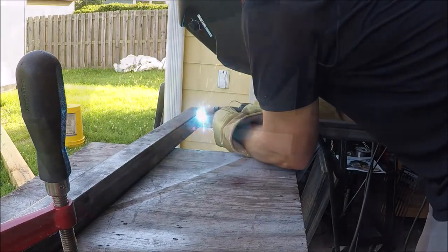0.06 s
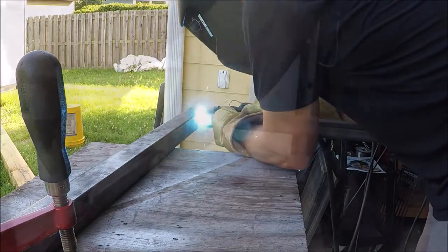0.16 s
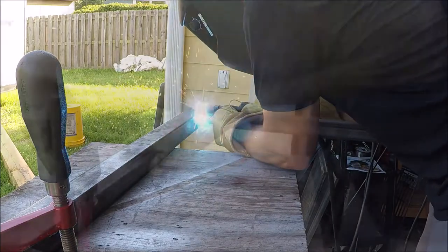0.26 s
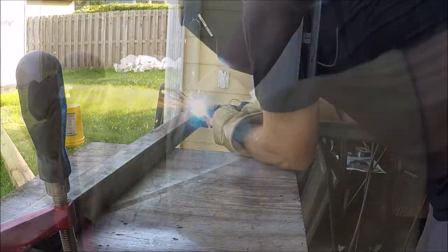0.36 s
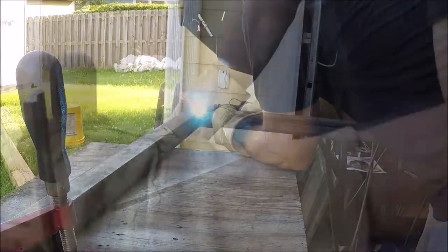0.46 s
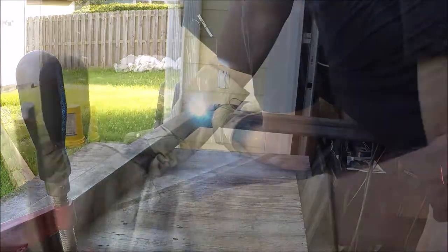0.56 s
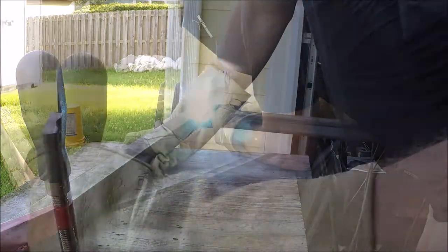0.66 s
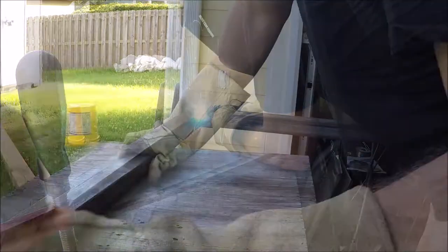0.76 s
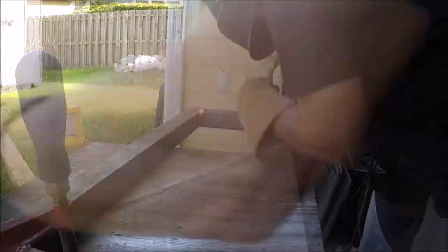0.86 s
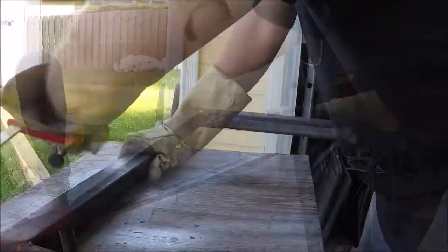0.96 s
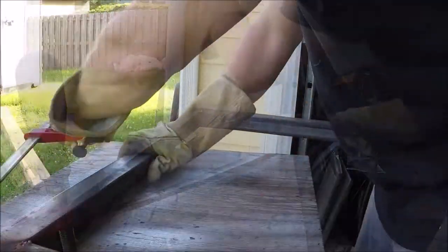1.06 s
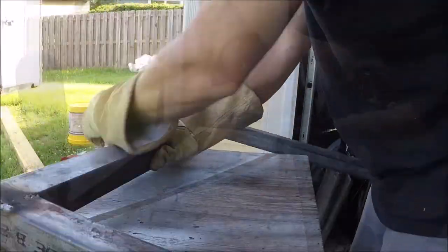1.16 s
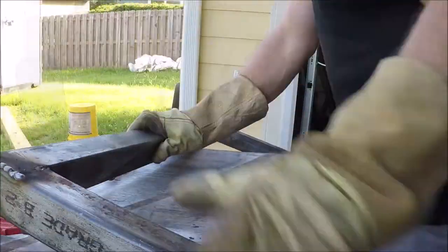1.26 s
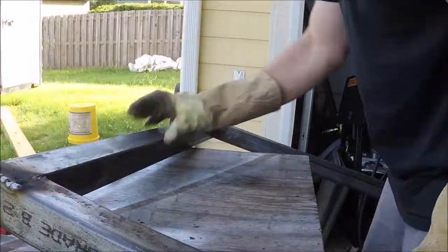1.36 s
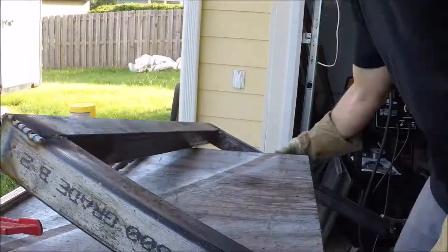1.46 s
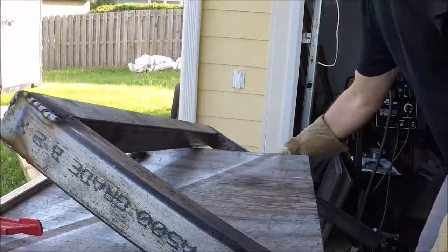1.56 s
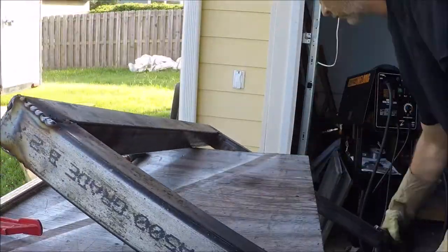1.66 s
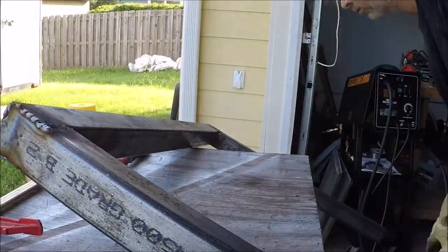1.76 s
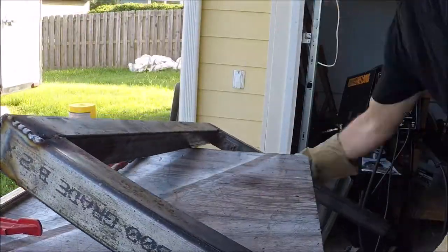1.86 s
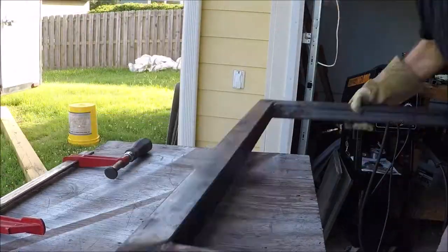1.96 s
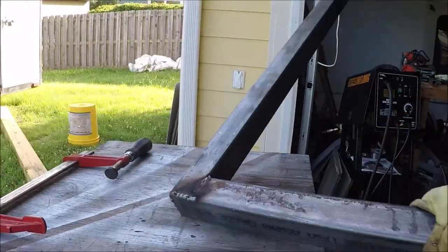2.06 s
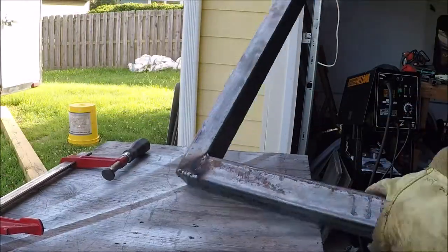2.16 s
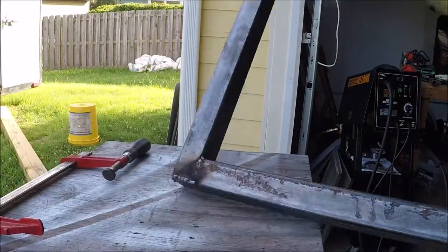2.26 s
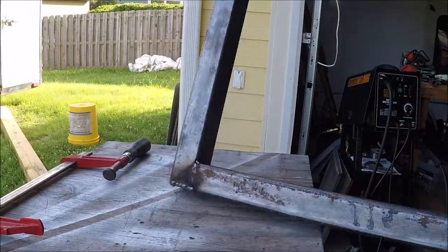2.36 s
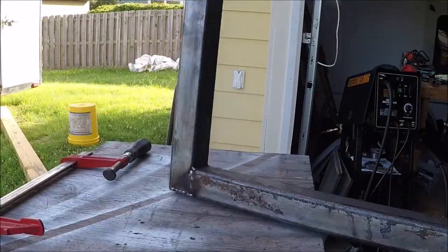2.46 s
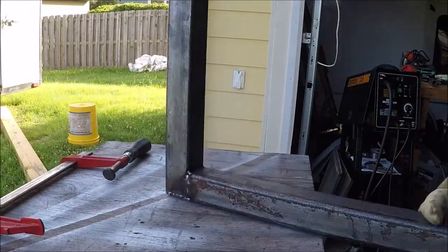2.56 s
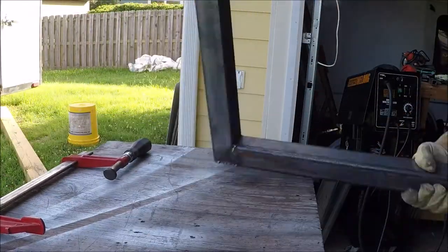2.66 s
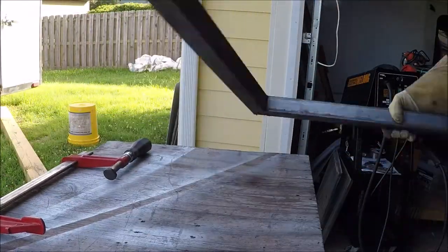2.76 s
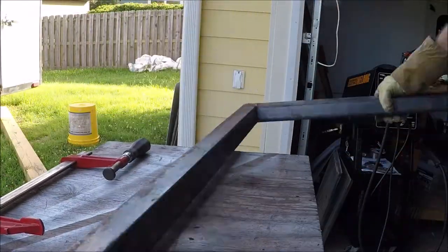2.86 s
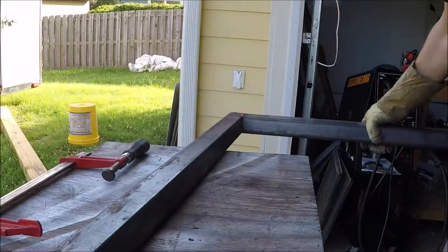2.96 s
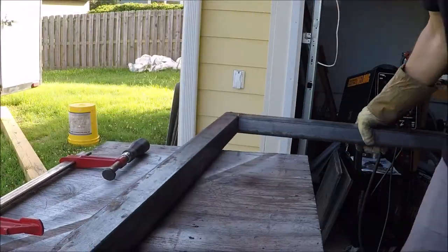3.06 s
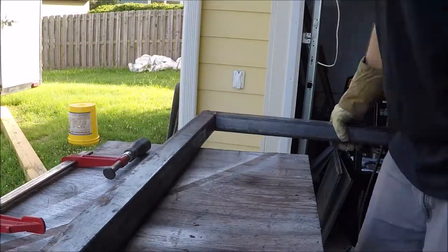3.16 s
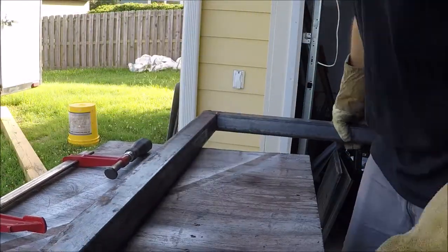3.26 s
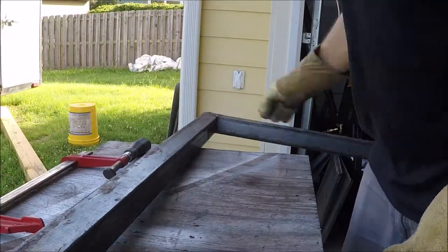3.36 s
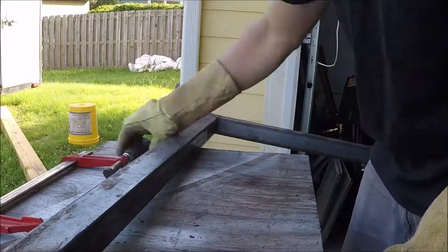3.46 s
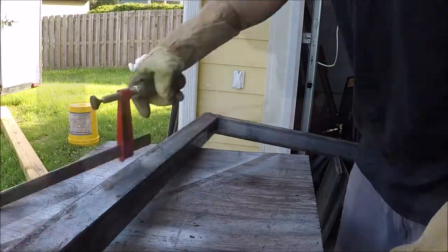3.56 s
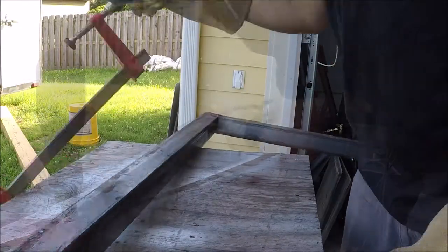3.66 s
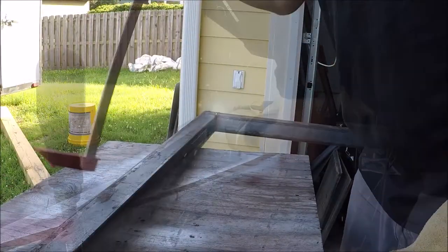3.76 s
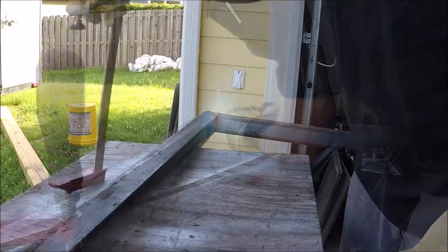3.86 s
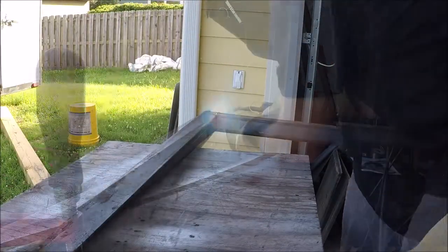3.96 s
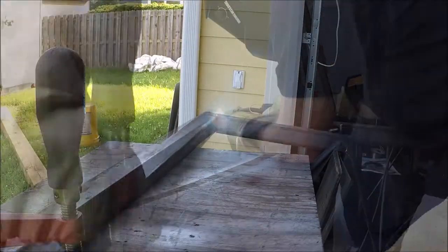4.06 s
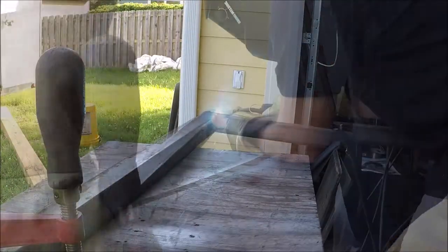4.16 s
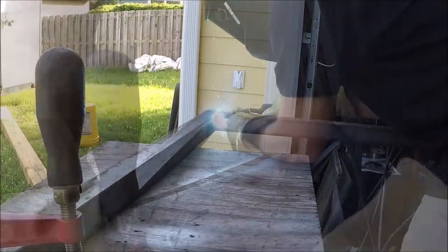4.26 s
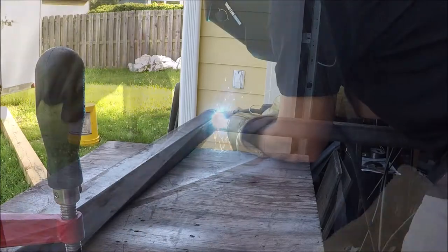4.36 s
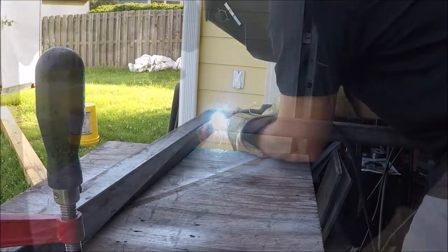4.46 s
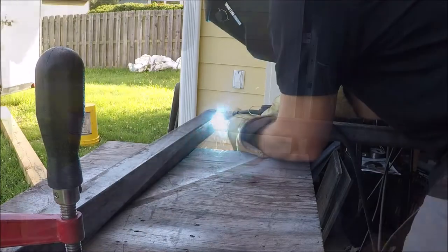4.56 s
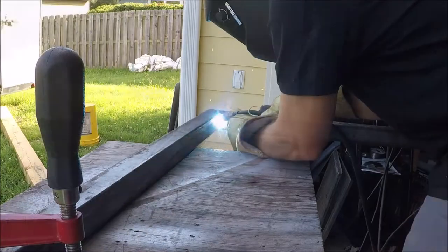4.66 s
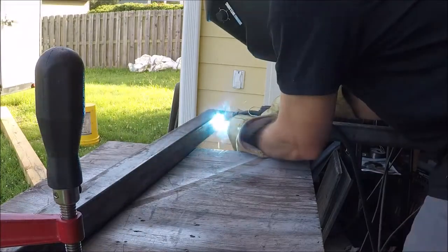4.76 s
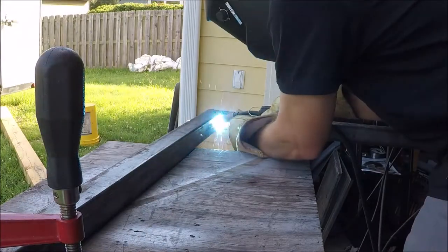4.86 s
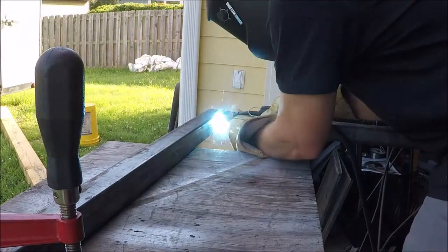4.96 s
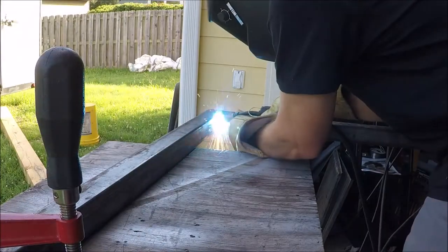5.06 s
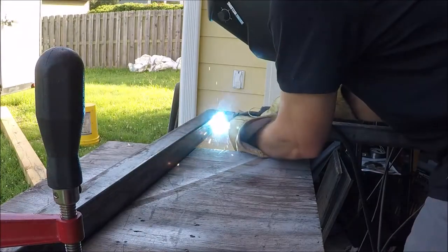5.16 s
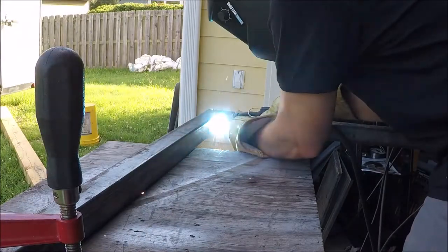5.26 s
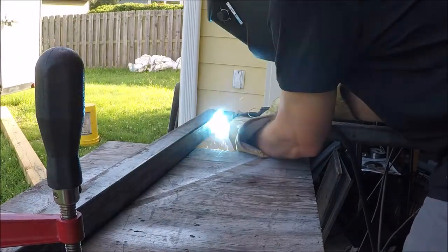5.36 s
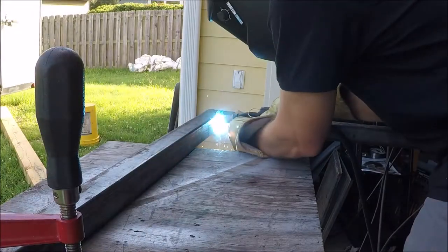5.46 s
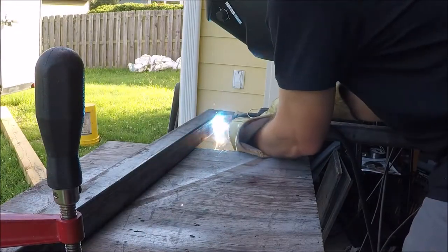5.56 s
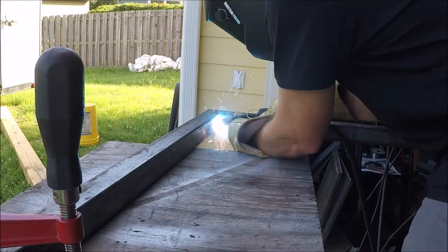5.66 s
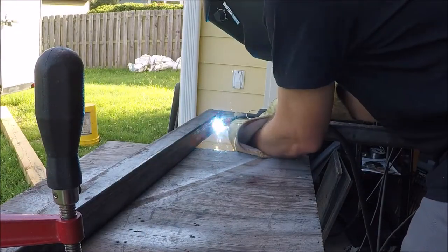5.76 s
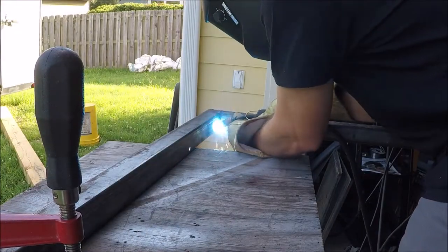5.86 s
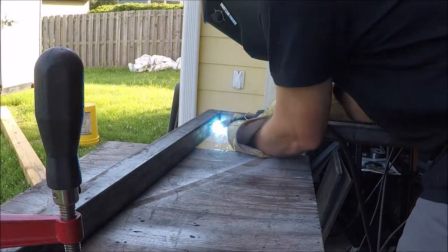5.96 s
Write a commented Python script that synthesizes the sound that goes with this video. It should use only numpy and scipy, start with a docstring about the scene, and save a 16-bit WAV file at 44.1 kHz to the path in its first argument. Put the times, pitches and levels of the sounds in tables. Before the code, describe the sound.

Sharp electric welding sputter gives way to a clamp clink and dull metallic knocks of a turned frame, then sputtering resumes over faint fan noise.

```python
"""At an open workshop door, a frame of square steel tubing is wire-welded on a wooden bench.
The arc, a train of short-circuit snaps, crackles and stops; a clamp clinks off, the frame is turned over
and clatters down (damped modes struck by blows), the clamp is dragged back and the arc starts again.
Gloves and sliding steel are shaped noise; a fan of noise and whines runs throughout, and a puff of wind
buffets the one close microphone near the start."""
import sys
import numpy as np
from scipy import signal
from scipy.fft import rfft, irfft
from scipy.io import wavfile
from scipy.ndimage import uniform_filter1d

SR = 44100
rng = np.random.default_rng(int(sys.argv[2]) if len(sys.argv) > 2 else 0)


def store_wav(level_fs):
    """Save 16-bit WAV to argv[1]."""
    pcm = np.round(np.clip(np.atleast_2d(level_fs), -1, 1) * 32767)
    wavfile.write(sys.argv[1], SR, pcm.T.astype(np.int16))


N = 264860
TIME = np.arange(N) / SR


def undb(db):
    """Logarithmic level: decibels to amplitude gain."""
    return 10 ** (np.asarray(db) / 20)


def unit(x):
    """Power normalisation: scale to rms 1."""
    return x / np.sqrt(np.mean(x ** 2) + 1e-20)


def unit_attack(x, size=900):
    """Onset normalisation: scale so that the first 20 ms have rms 1."""
    return x / np.sqrt(np.mean(x[:size] ** 2) + 1e-20)


def curve(rows, axis=1):
    """Linear interpolation: one column of a table, joined by straight lines in time."""
    rows = np.array(rows)
    return np.interp(TIME, rows[:, 0], rows[:, axis])


def fade(t60, size):
    """Exponential decay by 60 dB in t60 seconds."""
    return np.exp(-np.log(1000) * TIME[:size] / max(t60, 1e-3))


def add(track, s, sound):
    """Superposition: mix a sound in at time s."""
    i = max(int(s * SR), 0)
    track[i:i + len(sound)] += sound[:max(N - i, 0)]


def colour(x, points, size=4096):
    """Minimum-phase filtering: a causal response through (Hz, dB) points."""
    hz, db = np.transpose(points)
    bins = np.fft.rfftfreq(size, 1 / SR)
    response_db = np.interp(np.log(bins + 1), np.log(hz), db)
    cepstrum = irfft(np.log(undb(response_db)))
    # folding the cepstrum onto positive times makes the filter causal
    fold = 1 + np.sign(size // 2 - np.arange(size))
    fold[0] = 1
    impulse = irfft(np.exp(rfft(cepstrum * fold)))
    return signal.fftconvolve(x, impulse)[:len(x)]


def high_pass(x, hz, order=6):
    """Butterworth high-pass filtering."""
    return signal.sosfilt(signal.butter(order, hz, "highpass", fs=SR, output="sos"), x)


def noise(points, size=N):
    """Spectral shaping: coloured noise of rms 1."""
    return unit(colour(rng.standard_normal(size), points))


def walk(count):
    """Low-passed chance: a smooth wander with spread near 1, turning count times a second."""
    k = SR // count
    steps = np.repeat(rng.standard_normal(N // k + 1), k)
    return 1.3 * uniform_filter1d(steps, k)[:N]


def scatter(x, t60, size=22050):
    """Diffuse reflection: a decaying noise tail with the energy of the direct sound."""
    tail = rng.standard_normal(size) * fade(t60, size) * (1 - fade(0.0031, size))
    return signal.fftconvolve(x, tail / np.linalg.norm(tail))[:N]


def burns(bead):
    """Gating: true while this bead is being laid."""
    return (TIME >= bead[0][0]) & (TIME <= bead[-1][0])


# The two beads. Each row: time in seconds, crackle level in dB.
BEADS = [
    [(0, -34), (0.25, -34), (0.32, -30.5), (0.45, -34), (0.78, -30), (0.858, -26)],
    [(3.69, -45), (3.78, -35.5), (4.0, -30), (4.4, -33.5), (4.7, -31), (4.86, -35), (5.1, -33),
     (5.7, -34.5), (5.87, -36), (6.01, -34)],
]
# Wire feed. Each row: time in seconds, nominal short circuits per second,
# unevenness of the snaps in dB before the supply limits them.
WIRE_FEED = [(0, 384, 4), (0.3, 238, 0.5), (0.5, 323, 6.5), (0.62, 205, 0), (0.85, 335, 2), (3.7, 288, 18),
             (4.0, 453, 6.5), (4.6, 400, 5), (4.95, 272, 3.5), (6, 339, 2)]
# Faltering of the arc. Each row: middle in seconds, depth in dB.
STALLS = [(0.214, -23), (0.278, -11), (0.396, -8), (3.834, -28), (4.827, -50), (5.021, -6), (5.037, -15),
          (5.078, -24), (5.267, -20)]
# Spectrum of one snap. Each row: frequency in Hz, relative level in dB.
SNAP_COLOUR = [(450, -35), (700, -31), (1700, -8), (2700, -5.5), (3400, -9), (4600, -1.5), (6400, 4.5),
               (8400, -2), (9800, 1), (11000, 2.5), (13000, 0), (14200, -1), (15500, 1)]
# Echoes off tube, glove and bench. Each row: delay in ms, amplitude share (negative is inverted).
ECHOES = [(0.268, 0.014), (0.766, 0.12), (1.2, -0.13), (2.352, 0.36), (4.1, 0.16), (6.4, 0.093)]
STALL_S = 0.014  # length of a stall
SNAP_SHARPNESS = 0.15  # 0-1


def arc(count=4000, scatter_db=-9, spatter_db=-10, hiss_db=-20.0, heave_db=1.88):
    """Relaxation process: the wire shorts into the pool and the arc snaps back, harder after a long wait."""
    rate = curve(WIRE_FEED)
    gaps = np.exp(.5 * rng.standard_normal(count))
    gaps /= gaps.mean()
    # the pool heaves, so the shorts come in runs
    expected_shorts = np.cumsum(rate * undb(heave_db * walk(count=70))) / SR
    at = np.searchsorted(expected_shorts, np.cumsum(gaps))
    at = np.minimum(at, N - 1)
    # the supply limits the current of the biggest snaps
    uneven_db = curve(WIRE_FEED, axis=2)[at] * rng.standard_normal(count)
    sizes = np.tanh(.35 * gaps ** .7 * undb(uneven_db))
    snaps = np.zeros(N)
    snaps[at] = unit(sizes) * np.sqrt(SR / rate[at]) * (at < N - 1)
    # a second pulse of random size, two samples later, gives each snap its own colour
    snaps += .3 * np.roll(snaps * rng.standard_normal(N), 2)
    spatter = unit((rng.random(N) < 2 * rate / SR) * rng.standard_normal(N))
    hiss = undb(hiss_db + 2 * walk(count=150)) * rng.standard_normal(N)
    source = snaps + undb(spatter_db) * spatter + hiss
    source = source - SNAP_SHARPNESS * np.roll(source, 1)  # a faster collapse is brighter
    direct = unit(high_pass(colour(source, SNAP_COLOUR), 450, order=2))
    burning = sum(undb(curve(bead)) * burns(bead) for bead in BEADS)
    stall_db = sum(db * np.exp(-(2 * (TIME - s) / STALL_S) ** 4) for s, db in STALLS)
    direct = direct * burning * undb(stall_db)
    echoes = sum(share * np.interp(TIME - ms / 1000, TIME, direct, left=0) for ms, share in ECHOES)
    return direct + echoes + undb(scatter_db) * scatter(direct, t60=0.0082)


# Blows of frame and clamp on the bench. Each row: start in seconds, relative level in dB,
# brightness in dB, favoured pitch in Hz.
KNOCKS = [(0.284, -24, 2, 970), (0.553, -31.5, 4.5, 1040), (0.572, -25, 1.5, 815), (0.758, -28.5, 1.5, 704),
          (0.831, -28, 5.5, 910), (0.849, -31, 6, 1007), (0.882, -27.5, -6, 700), (1.023, -24, -5, 790),
          (1.052, -26, 10, 1160), (1.114, -24, -5, 690), (1.146, -30.5, 8, 2720), (1.16, -19.5, -2.5, 730),
          (1.201, -12.5, -0.5, 630), (1.212, -20, 10, 950), (1.24, -16.5, -4, 675), (1.869, -34.5, -5, 715),
          (2.009, -17, -8, 800), (2.04, -13.5, 5, 1250), (2.086, -7.5, -2, 604), (2.105, -11.5, 1, 577),
          (2.119, -14.5, 1.5, 694), (2.139, -16, -8, 810), (2.187, -9.5, -2, 620), (2.229, -10, -0.5, 597),
          (2.291, -18, -4.5, 710), (2.341, -30, -2.5, 680), (2.516, -27.5, 2, 1100), (2.59, -27, -8.5, 710),
          (2.619, -27.5, 5, 1060), (2.682, -27.5, -4.5, 670), (2.718, -17, -0.5, 1120),
          (2.727, -26, -10, 740), (2.895, -12, 5.5, 1080), (2.903, -14.5, 6.5, 660), (2.908, -16, 1.5, 613),
          (2.942, -12.5, 3.5, 1120), (2.968, -11.5, 2, 664), (2.993, -17.5, -4, 694),
          (3.059, -21.5, 1, 393), (3.077, -21, -7.5, 770), (3.233, -28, -6, 640), (3.312, -40, 4.5, 1000),
          (3.597, -24.5, -9, 610), (3.627, -12, -7, 720), (3.676, -27.5, 4, 990), (3.719, -30, 3, 971),
          (3.744, -17, -8, 638), (3.79, -29, 4, 1080), (3.858, -6.5, -2, 674), (3.955, -32, -4, 657),
          (4.198, -22, -7.5, 760), (4.226, -32, 10, 1010), (4.523, -24, 6.5, 1089), (4.553, -23.5, -8, 760),
          (4.712, -18.5, -1.5, 800)]
# Light taps while clamp and torch are handled. Each row: start in seconds, end in seconds,
# middle relative level in dB.
HANDLING = [(0.314, 0.7, -36.5), (4.289, 4.42, -36.5)]
TAP_GAP_S, TAP_SPREAD_DB, TAP_BRIGHT_DB, TAP_HZ = 0.095, 2.5, 8, 880  # mean gap and pitch
# each blow bounces back after this time, weaker and duller
REBOUND_S, REBOUND_DB, REBOUND_BRIGHT_DB = 0.015, -11.5, -0.5
RATTLE_S, RATTLE_DB = 0.026, -18.5  # and chatters once more as it settles
# the thud grows as a power of the summed, decaying level of earlier blows (time constant in s)
THUD_DB, THUD_GROWTH, MEMORY_S = -10, 1.43, 0.29


def contacts():
    """Repeated impact: knocks, bounces and taps as rows (s, level dB, thud dB, brightness dB, pitch Hz)."""
    rows = list(KNOCKS)
    for s, level, bright, hz in KNOCKS:
        rows.append((s + REBOUND_S, level + REBOUND_DB, bright + REBOUND_BRIGHT_DB, hz))
        rows.append((s + RATTLE_S, level + RATTLE_DB, bright, hz))
    for start, end, level in HANDLING:
        chances = rng.standard_normal((20, 3))
        for s, (late, force, place) in zip(np.arange(start, end, TAP_GAP_S), chances):
            tap_s = s + 0.25 * TAP_GAP_S * late
            tap_hz = TAP_HZ * np.exp(0.067 * place)
            rows.append((tap_s, level + TAP_SPREAD_DB * force, TAP_BRIGHT_DB, tap_hz))
    s, level, bright, hz = np.transpose(rows)
    since = s[:, None] - s
    earlier = ((since > 0) * np.exp(-np.abs(since) / MEMORY_S)) @ undb(level)
    thud = THUD_DB + THUD_GROWTH * 20 * np.log10(earlier + 0.02)
    return np.transpose([s, level, thud, bright, hz])


# Groups of close modes of the frame on the bench. Each row: centre in Hz, width in Hz, relative level in dB.
FRAME_MODES = [(170.4, 124, -7), (289.8, 140.6, 4.5), (434, 110, 1), (519.6, 91, -0.5), (625.6, 125, -1),
               (747, 116, 1.5), (1014, 254, 1.5), (1323, 210, -1), (1583, 240, -5), (1955, 216, -5),
               (2246, 330, -7.5), (2770, 425, 3), (3688, 830, -0.5), (4570, 990, -2), (5850, 1280, -4),
               (7920, 1100, -9), (11660, 7300, -3.5)]
# Borders between thud, body, clang and crack. Each entry: frequency in Hz.
REGISTER_HZ = [570, 900, 2500]
KNOCK_T60_S, MEDIUM_KNOCK_DB = 0.078, -17  # body ring time and level of a medium blow
# light blows damp the frame less and ring longer; dull blows push for longer
RING_PER_DB, CONTACT_PER_DB = 0.02, 0.7
CRACK_DB, CRACK_SLOPE = -10.5, 1  # the crack of a blow of brightness 0, and its dB per dB of brightness


def knocks(blows, count=14, size=11000, body_db=-7, thud_db=-1, thud_ring=1.86, clang_ring=0.54,
           crack_ring=0.62, contact_t60=0.0016, thud_low_hz=130, body_low_hz=530, favour_db=7,
           favour_width=0.16):
    """Modal superposition: blows ring the same modes with new weights; the bench top damps them fast."""
    centre, width, db = np.repeat(FRAME_MODES, count, axis=0).T
    place = (np.arange(len(centre)) % count + rng.random(len(centre))) / count
    hz = centre + width * (place - .5)
    phase = hz[:, None] * TIME[:size] + rng.random((len(hz), 1))
    partials = undb(db)[:, None] * np.sin(2 * np.pi * phase)
    register = np.digitize(centre, REGISTER_HZ)
    groups = [register == k for k in np.unique(register)]
    thuds, rings = np.zeros(N), np.zeros(N)
    ring_times = (thud_ring, 1, clang_ring, crack_ring)
    tracks = (thuds, rings, rings, rings)
    for s, level, thud, bright, main_hz in blows:
        # the push builds while the surfaces meet
        rise = 2 - fade(contact_t60 * np.exp(-CONTACT_PER_DB * bright), size)
        t60 = KNOCK_T60_S * np.exp(-RING_PER_DB * (level - MEDIUM_KNOCK_DB))
        # the point of contact favours the modes near one pitch
        favour = np.exp(-(np.log(hz / main_hz) / favour_width) ** 2)
        weights = rng.standard_normal(len(hz)) * undb(favour_db * favour)
        levels = (thud + thud_db, 0, bright, CRACK_DB + CRACK_SLOPE * bright)
        for group, part_db, ring, track in zip(groups, levels, ring_times, tracks):
            sound = weights[group] @ partials[group] * fade(t60 * ring, size) * rise
            add(track, s, undb(level + body_db + part_db) * unit_attack(sound))
    # modes radiate little below their own pitch
    return high_pass(thuds, thud_low_hz, order=2) + high_pass(rings, body_low_hz, order=10)


# Modes in which the tubing sings on after a blow. Each row: frequency in Hz, relative level in dB.
TUBE_MODES = [(237, -5), (320, 21), (405, -26), (466, -26), (618, 6), (697, 1), (724, -2), (1011, 0.5),
              (1100, -7.5), (1348, -18), (1436, -9), (1899, -10.5), (1961, -36), (2216, -21), (2289, -23.5),
              (2597, -6.5), (2780, -28), (3748, -21), (5230, -10), (7386, -23)]


def tubing(blows, size=26000, ring_db=-26, ring_t60=0.22):
    """Free vibration: the hollow steel rings on after each blow; its lowest modes need a thudding one."""
    hz, db = np.transpose(TUBE_MODES)
    swell = fade(ring_t60, size) * (1 - fade(0.035, size))
    partials = np.sin(2 * np.pi * hz[:, None] * TIME[:size]) * swell
    out = np.zeros(N)
    for s, level, thud, *_ in blows:
        low_db = (thud - 13) * (hz < REGISTER_HZ[0])
        weights = undb(db + low_db + 2 * rng.standard_normal(len(hz)))
        signs = rng.choice([-1, 1], len(hz))
        add(out, s, undb(level + ring_db) * (weights * signs) @ partials)
    return out


# Steel touching steel. Each row: start in seconds, relative level in dB, favoured pitch in Hz
# (14300, away from every mode, gives an unpitched jangle), ring time of a favoured mode in seconds.
CLINKS = [(0.551, -30.5, 12200, 0.038), (0.689, -31, 12900, 0.055), (0.859, -25.5, 10000, 0.034),
          (0.921, -28, 15200, 0.034), (1.019, -16, 10015, 0.2), (1.146, -19.5, 6370, 0.06),
          (1.207, -17.5, 11300, 0.012), (1.771, -32, 13800, 0.072), (1.803, -37.5, 12500, 0.094),
          (1.925, -33.5, 8750, 0.08), (2.007, -25, 14300, 0.3), (2.051, -30, 14300, 0.13),
          (2.196, -28.5, 14300, 0.15), (2.302, -29, 12500, 0.07), (2.512, -37.5, 11300, 0.054),
          (2.615, -29.5, 11220, 0.08), (2.674, -38.5, 11200, 0.07), (3.112, -38.5, 11350, 0.025),
          (3.593, -41.5, 11200, 0.04), (3.684, -29, 7430, 0.0078), (3.712, -27, 10000, 0.14),
          (4.152, -25.5, 7450, 0.053), (4.524, -25.5, 6450, 0.099)]
# Ringing of the clamp. Each row: frequency in Hz, relative level in dB.
CLAMP_MODES = [(2778, 5), (3935, -12), (4635, -11), (5006, 2), (6380, 7), (7386, 11.5), (7700, -22),
               (7973, -4), (8770, 3.5), (9755, 10), (10015, -6.5), (10340, 12), (11090, -10), (11320, 13.5),
               (12040, -18), (12510, 7), (12930, -2.5), (13330, 17.5), (13850, -23), (15170, 12.5),
               (15600, 0)]
PURITY_DB_PER_S = 149  # the longer a clink rings, the more a mode at its favoured pitch stands out


def clinks(size=13000, tick_db=3, tick_t60=0.04, sizzle_db=-6, focus_hz=150, detune_hz=170,
           chatter_share=0.024, held_t60=0.086):
    """Selective excitation: after a hard tick, modes near one pitch are favoured; the grip damps the rest."""
    hz, db = np.transpose(CLAMP_MODES)
    out = np.zeros(N)
    for s, level, main_hz, t60 in CLINKS:
        main_db = PURITY_DB_PER_S * t60
        favour = np.exp(-((hz - main_hz) / focus_hz) ** 2) * np.tanh(main_db / 8)
        # the grip shifts the other modes
        pitch = hz + detune_hz * (1 - favour) * rng.standard_normal(len(hz))
        free, held = fade(t60, size), fade(min(t60, held_t60), size)
        # chattering contact smears the held modes
        drift = np.cumsum(rng.standard_normal((len(hz), size)), axis=1)
        chatter = chatter_share * (1 - favour[:, None]) * drift
        phase = pitch[:, None] * TIME[:size] + chatter + rng.random((len(hz), 1))
        partials = np.sin(2 * np.pi * phase) * (held + favour[:, None] * (free - held))
        spread_db = 0.7 * (0.5 + favour) * rng.standard_normal(len(hz))
        ring = undb(db + main_db * favour + spread_db) @ partials / 2
        contact = noise([(600, 2), (2500, 9.5), (7000, 11.5), (13000, -6)], size=size)
        tick = contact * (undb(tick_db) * fade(tick_t60, size) + undb(sizzle_db) * held)
        add(out, s, undb(level - 3.5) * unit_attack(ring + tick))
    return high_pass(out, 930)


# Steel sliding on the bench. Each row: start in seconds, length in seconds, level in dB.
SLIDES = [(0.26, 0.28, -44.5), (0.61, 0.23, -39.5), (1.977, 0.19, -35.5), (2.101, 0.074, -28),
          (3.484, .11, -34.5), (3.605, 0.2, -36.5), (3.897, 0.59, -43)]
# Spectrum of the sliding. Each row: frequency in Hz, relative level in dB.
SLIDE_COLOUR = [(400, -22.5), (620, 1.5), (1000, 2.5), (1200, 3.5), (1430, 2), (1700, -11), (2600, -9.5),
                (5000, -19), (12000, -29), (16000, -31)]


def slides(grain_db=2.0, jerk_db=2.0):
    """Stick-slip friction: rough steel catches and slips on the boards in dense, uneven grains."""
    push = sum(undb(db) * ((TIME > s) & (TIME < s + length)) for s, length, db in SLIDES)
    unevenness_db = grain_db * walk(count=900) + jerk_db * walk(count=40)
    grains = rng.standard_normal(N) * undb(unevenness_db)
    return uniform_filter1d(push, size=300) * unit(colour(grains, SLIDE_COLOUR))


# Leather gloves brushing the steel. Each row: middle in seconds, length in seconds, middle level in dB.
BRUSHES = [(0.922, 0.012, -32.5), (1.393, 0.07, -42), (1.532, 0.017, -39), (1.714, 0.013, -44.5),
           (3.148, 0.023, -44), (3.293, 0.042, -44.5)]
# Spectrum of the leather. Each row: frequency in Hz, relative level in dB.
GLOVE_COLOUR = [(400, -49), (700, 7), (1900, 3.5), (3000, 3.5), (6000, -0.5), (11000, -2.5), (16000, -13)]


def gloves(grain_db=3):
    """Dry friction: stiff leather rubs in short swells of grainy noise."""
    rub = sum(undb(db) * np.exp(-(2 * (TIME - s) / length) ** 4) for s, length, db in BRUSHES)
    return rub * noise(GLOVE_COLOUR) * undb(grain_db * walk(count=500))


# Spectrum of the rumble. Each row: frequency in Hz, relative level in dB.
RUMBLE_COLOUR = [(20, -7), (45, -12), (70, 4.5), (100, 0), (150, 3), (250, 3), (420, 2), (700, -12.5),
                 (1500, -19), (5000, -29)]


def rumble(blows, size=60000, rumble_db=-28.5, force_share=0.77, thud_share=0.71, rumble_t60=1.42,
           least_thud_db=-28):
    """Energy summation: after thudding blows a low noise swells and fades over about a second."""
    power = np.zeros(N)
    swell = fade(rumble_t60, size) * (1 - fade(0.28, size))
    for s, level, thud, *_ in blows:
        if thud > least_thud_db:
            level_db = force_share * level + thud_share * thud + rumble_db
            add(power, s, (undb(level_db) * swell) ** 2)
    return np.sqrt(power) * noise(RUMBLE_COLOUR)


# Spectrum of the rushing air and the arc's low roar. Each row: frequency in Hz, relative level in dB.
RUSH_COLOUR = [(30, -42), (300, -34), (480, -25), (600, 1.5), (720, -0.5), (830, -2.5), (950, 1.5),
               (1100, -3.5), (1350, -6), (2200, -9.5), (3600, -16.5), (7000, -20), (11000, -24),
               (16000, -25.5)]
# Whines of the fan. Each row: middle frequency in Hz, rms level in dB.
FAN_LINES = [(942, -54), (1314, -58), (2815, -65), (6568, -67.5), (7510, -68)]
# steady fan rush; what the arc's own low roar adds to it; the time over which the roar comes and goes
RUSH_DB, ROAR_DB, ROAR_SMOOTH_S = -46, 3, 0.13


def fan_and_roar(flutter_db=1.0, waver_hz=4):
    """Broadband and tonal flow noise: a steady fan rush with whines, plus the arc's low roar as it burns."""
    burning = sum(1.0 * burns(bead) for bead in BEADS)
    roar = uniform_filter1d(burning, int(ROAR_SMOOTH_S * SR))
    # the fan and the roar share one noise
    rush = noise(RUSH_COLOUR) * undb(RUSH_DB + ROAR_DB * roar + flutter_db * walk(count=20))
    whine = np.zeros(N)
    for hz, db in FAN_LINES:
        cycles = np.cumsum(hz + waver_hz * walk(count=40)) / SR
        whine += undb(db) * np.sqrt(2) * np.sin(2 * np.pi * cycles)
    return rush + whine


# Spectrum of the wind. Each row: frequency in Hz, relative level in dB.
GUST_COLOUR = [(20, -28), (45, 0), (170, -2.5), (280, -11.5), (450, -9), (900, -40), (3000, -63)]
# start; rise time; age at which the decay begins; decay time; level
GUST_S, GUST_ATTACK_S, GUST_HOLD_S, GUST_T60_S, GUST_DB = 0.038, 0.02, 0.16, 0.8, -37.5


def gust(buffet_db=2):
    """Turbulent pressure: a puff of wind buffets the microphone; it rises, holds and dies away."""
    age = TIME - GUST_S
    rise = np.clip(age / GUST_ATTACK_S, 0, 1)
    decay = np.exp(-np.log(1000) * np.maximum(age - GUST_HOLD_S, 0) / GUST_T60_S)
    return noise(GUST_COLOUR) * rise * decay * undb(GUST_DB + buffet_db * walk(count=30))


# Colour of the workshop's ring. Each row: frequency in Hz, relative level in dB.
SHOP_COLOUR = [(100, -1), (700, -21), (2000, 12.5), (6000, -1), (15000, 12)]


def workshop(work):
    """Reverberation: a faint, short diffuse ring of the workshop behind the work."""
    return undb(-19.5) * colour(scatter(work, t60=0.09), SHOP_COLOUR)


def scene():
    """Superposition of all sources, identical in both channels."""
    blows = contacts()
    work = arc() + knocks(blows) + tubing(blows) + clinks() + slides() + gloves()
    mono = work + rumble(blows) + fan_and_roar() + gust() + workshop(work)
    return np.tile(mono, (2, 1))


TOP_HZ = 15900  # cutoff of the low-pass


def record(dry):
    """Saturation and band limiting: the loudest peaks are rounded and the top is cut."""
    rounded = dry / (1 + dry ** 4) ** .25
    top = signal.firwin(255, TOP_HZ, window="blackman", fs=SR)
    return signal.fftconvolve(rounded, top[None], mode="same", axes=1)


dry = scene()
out = record(dry)
store_wav(out)
```